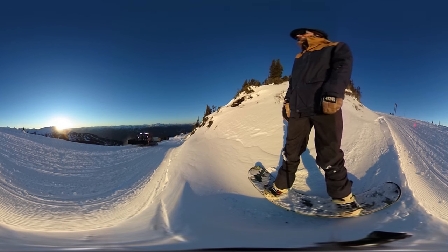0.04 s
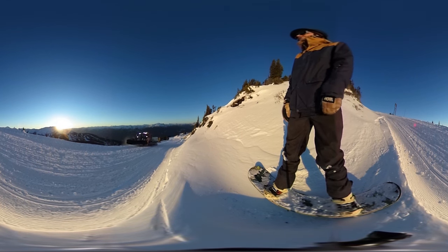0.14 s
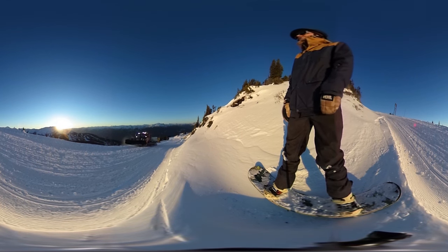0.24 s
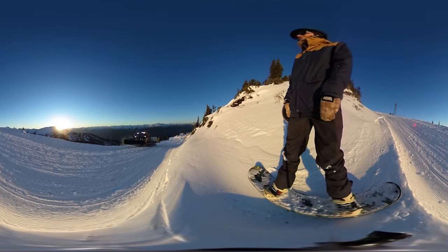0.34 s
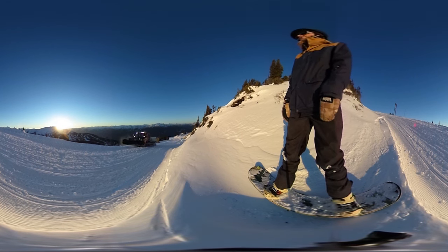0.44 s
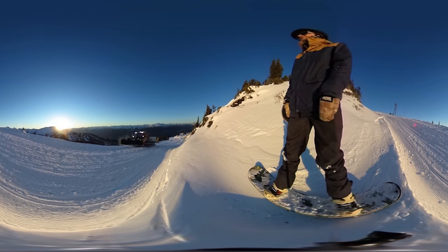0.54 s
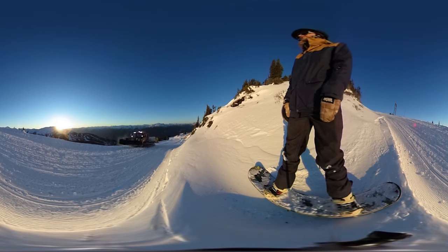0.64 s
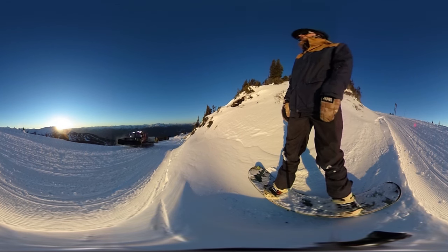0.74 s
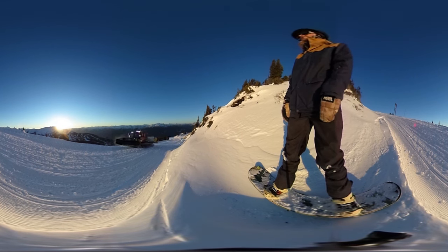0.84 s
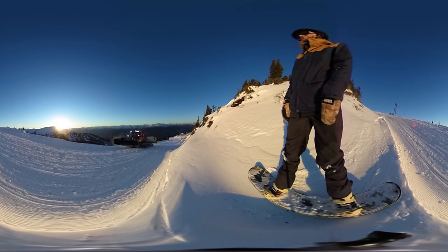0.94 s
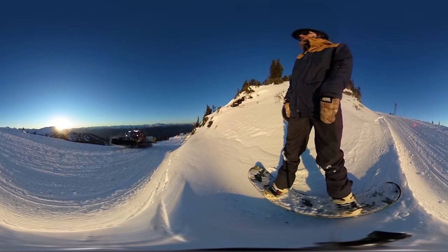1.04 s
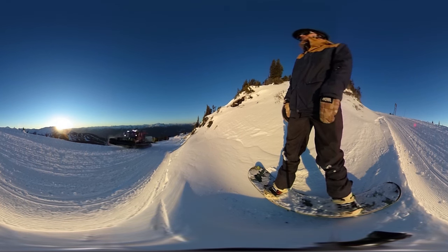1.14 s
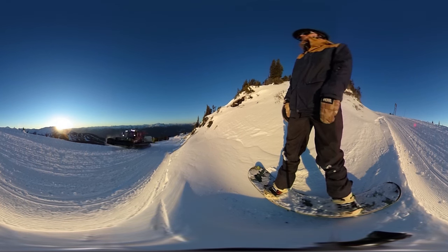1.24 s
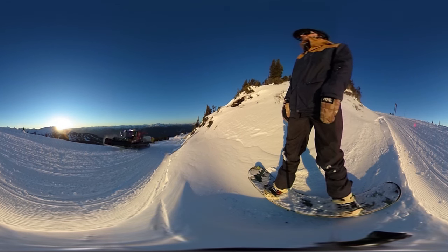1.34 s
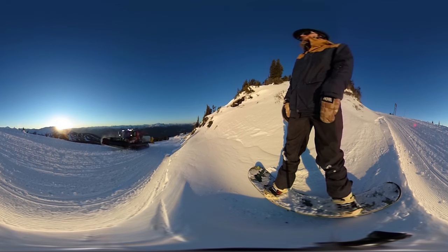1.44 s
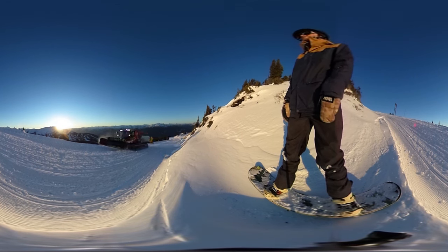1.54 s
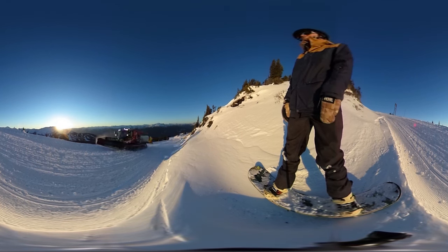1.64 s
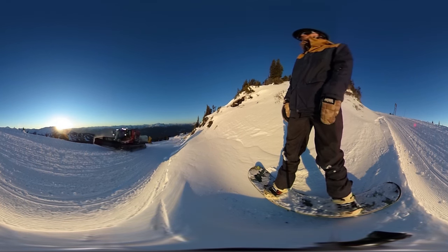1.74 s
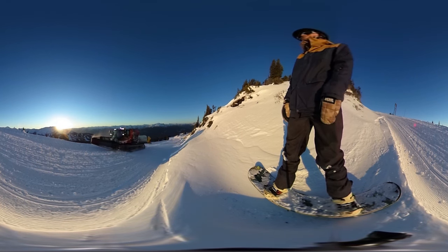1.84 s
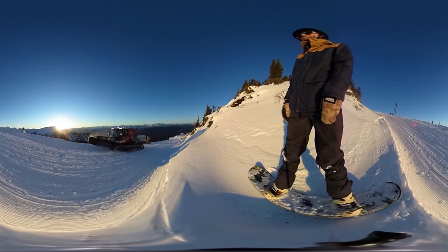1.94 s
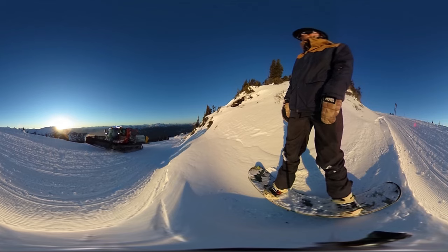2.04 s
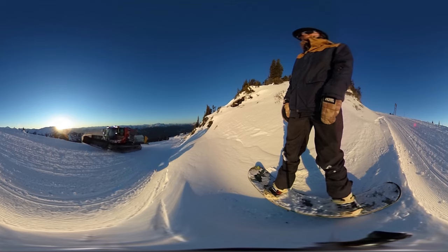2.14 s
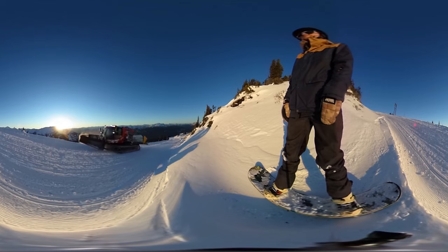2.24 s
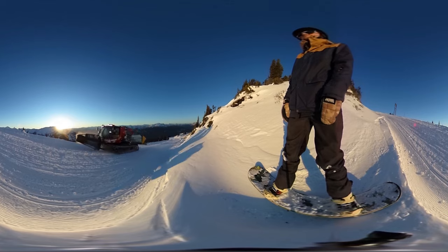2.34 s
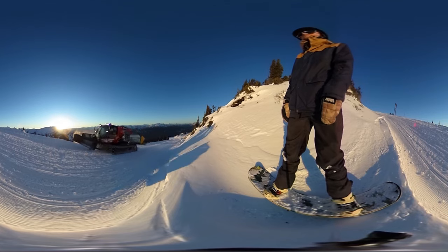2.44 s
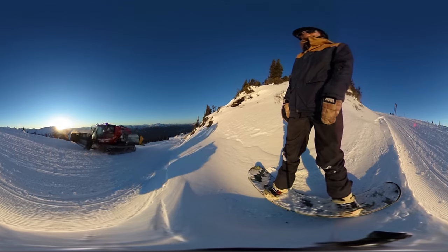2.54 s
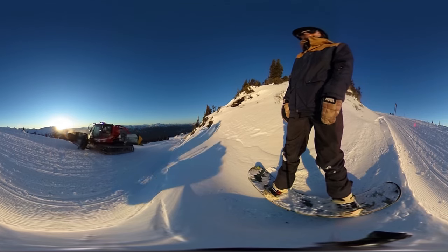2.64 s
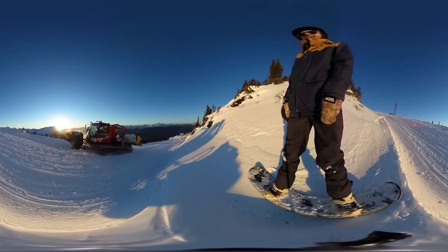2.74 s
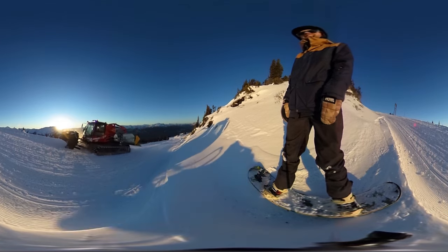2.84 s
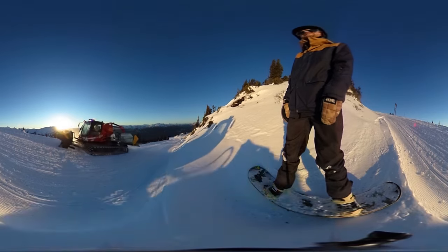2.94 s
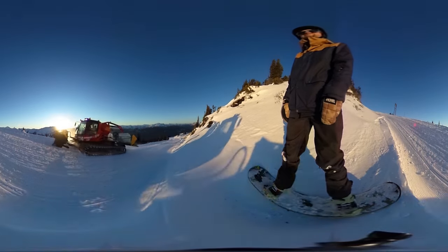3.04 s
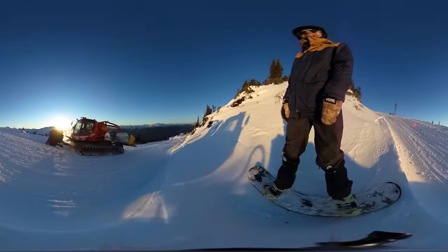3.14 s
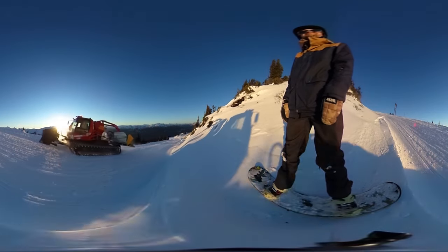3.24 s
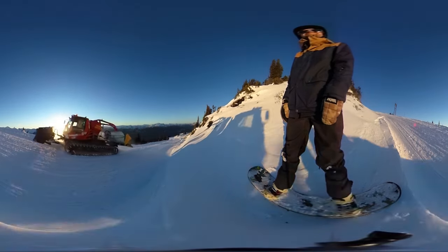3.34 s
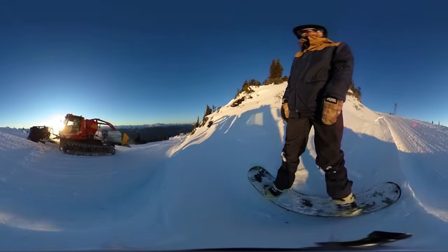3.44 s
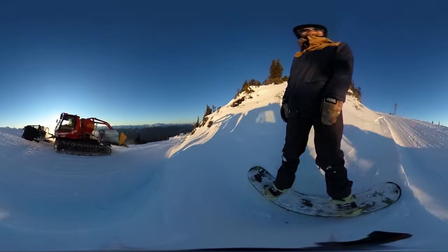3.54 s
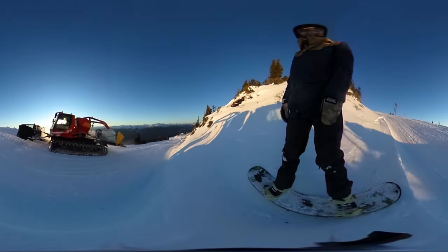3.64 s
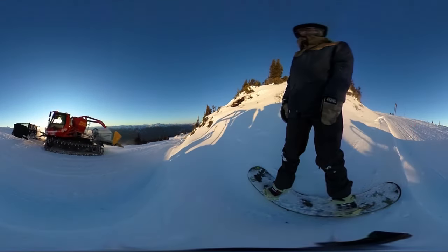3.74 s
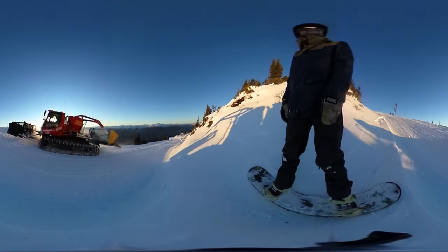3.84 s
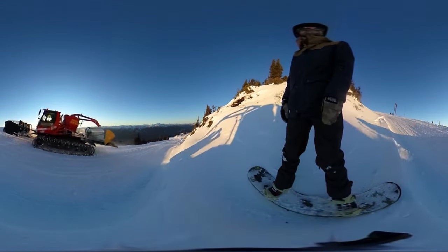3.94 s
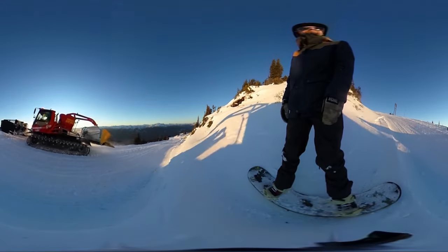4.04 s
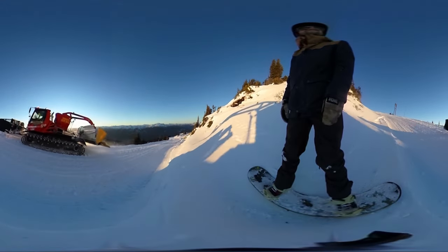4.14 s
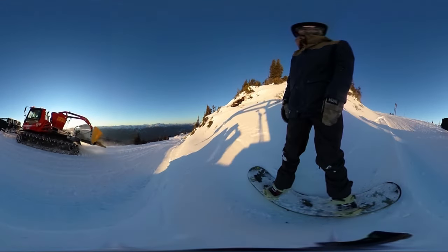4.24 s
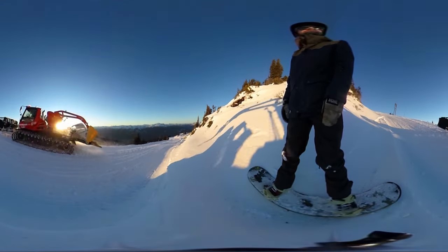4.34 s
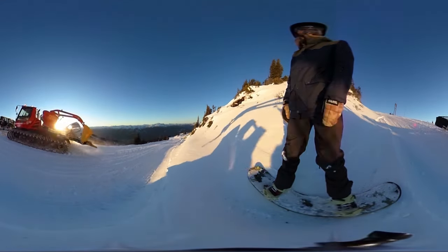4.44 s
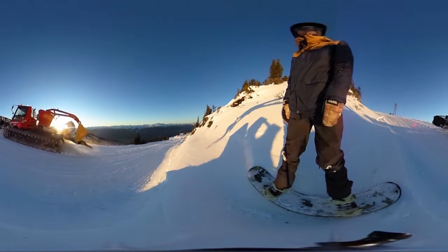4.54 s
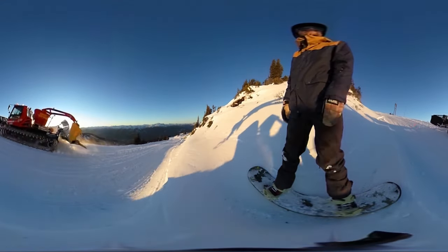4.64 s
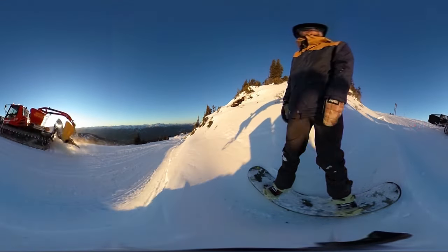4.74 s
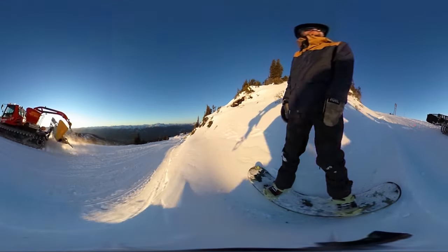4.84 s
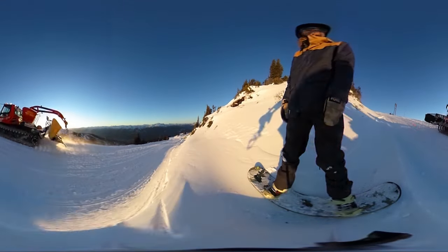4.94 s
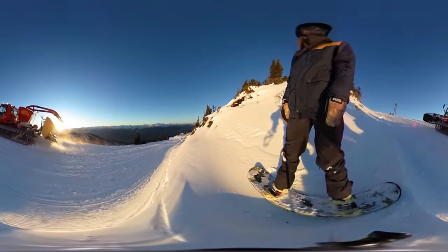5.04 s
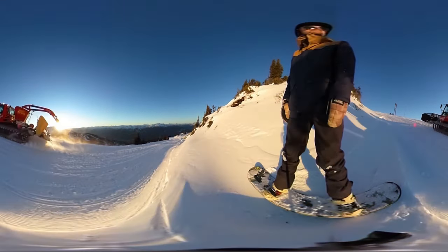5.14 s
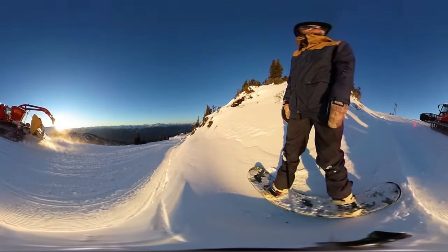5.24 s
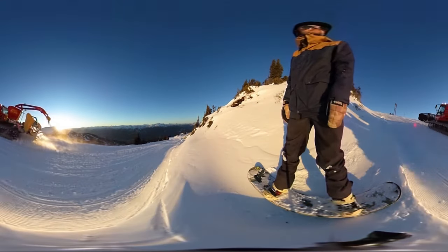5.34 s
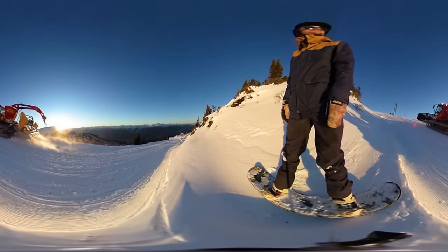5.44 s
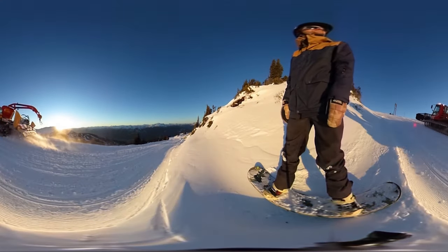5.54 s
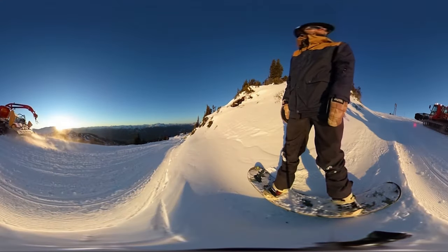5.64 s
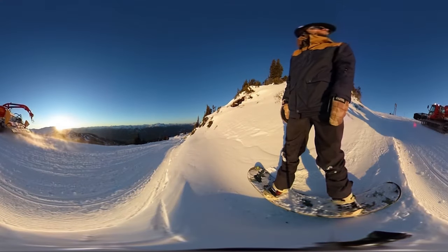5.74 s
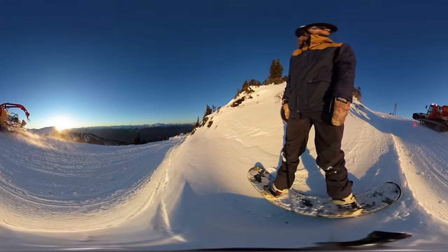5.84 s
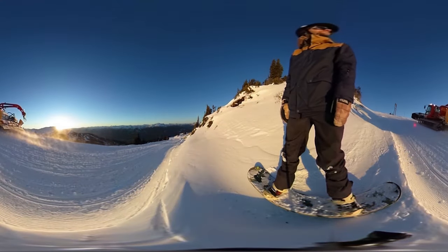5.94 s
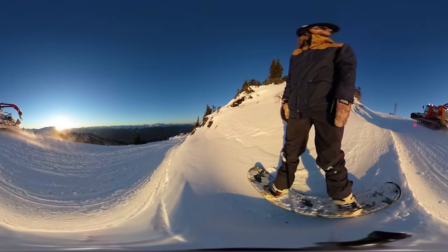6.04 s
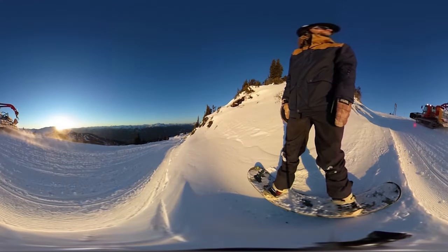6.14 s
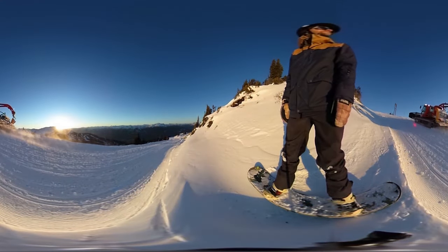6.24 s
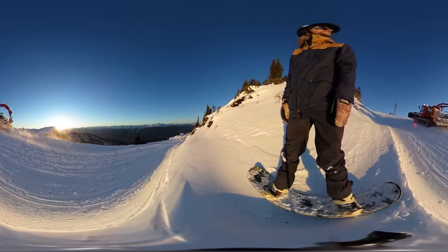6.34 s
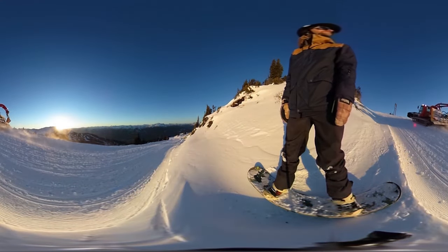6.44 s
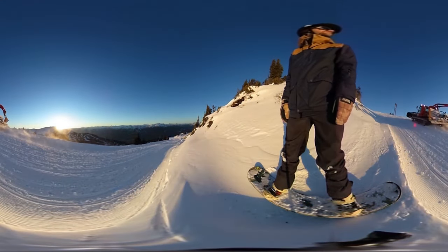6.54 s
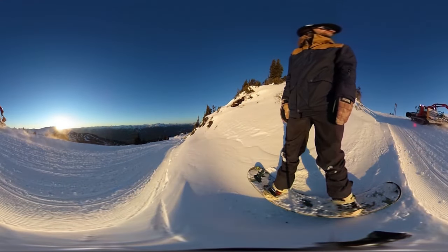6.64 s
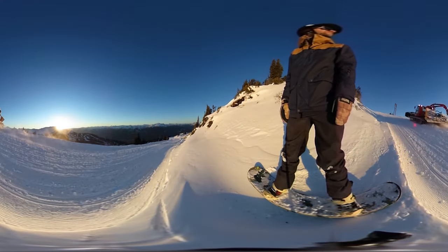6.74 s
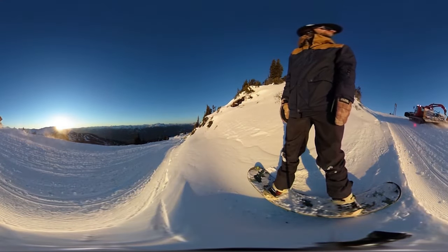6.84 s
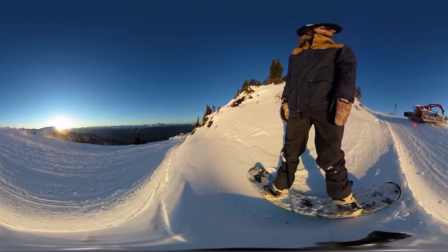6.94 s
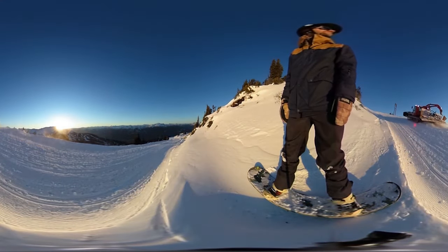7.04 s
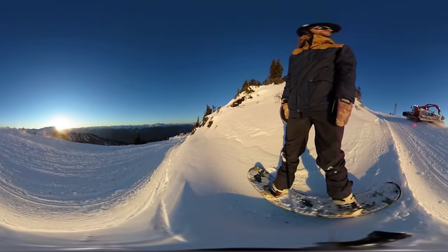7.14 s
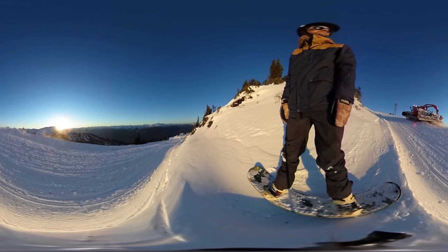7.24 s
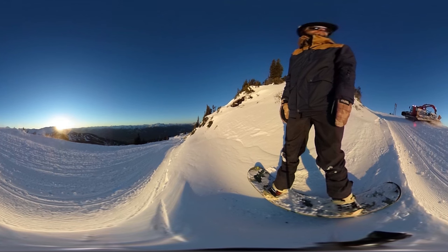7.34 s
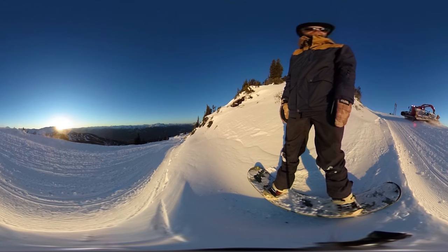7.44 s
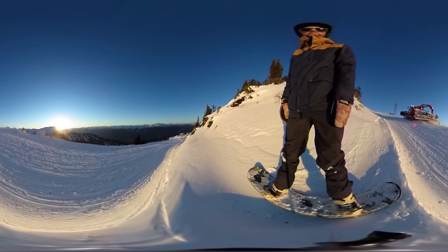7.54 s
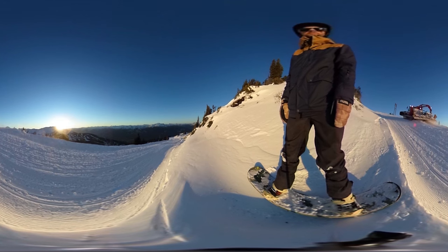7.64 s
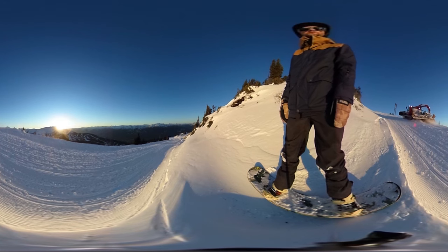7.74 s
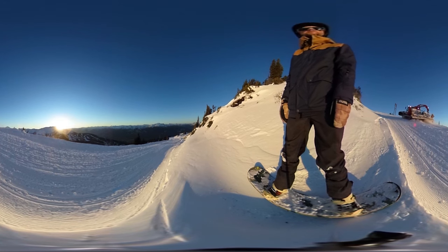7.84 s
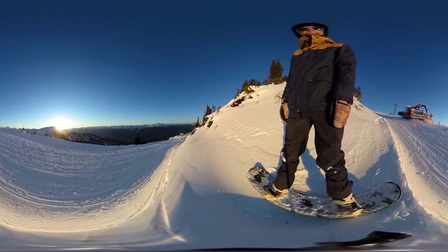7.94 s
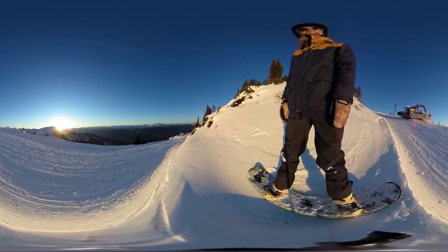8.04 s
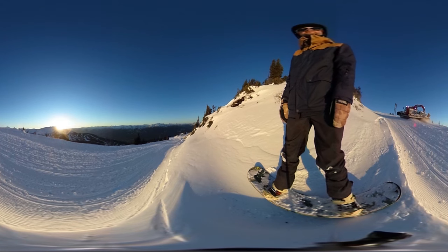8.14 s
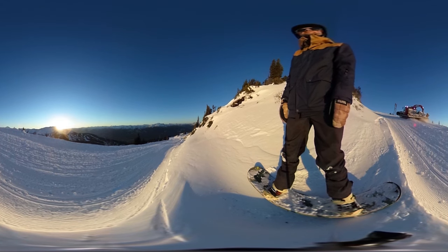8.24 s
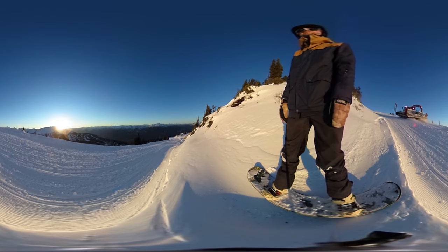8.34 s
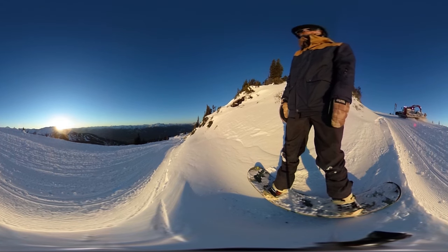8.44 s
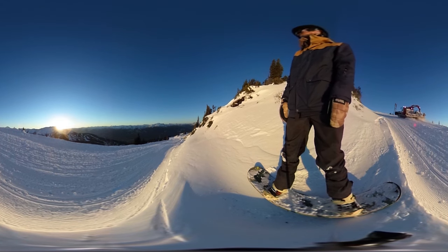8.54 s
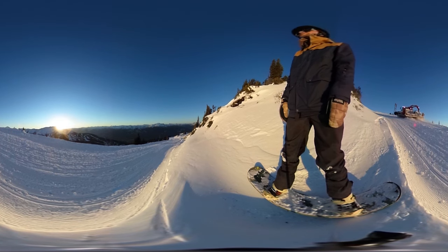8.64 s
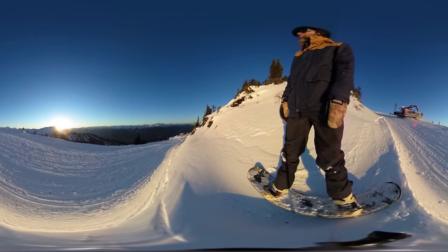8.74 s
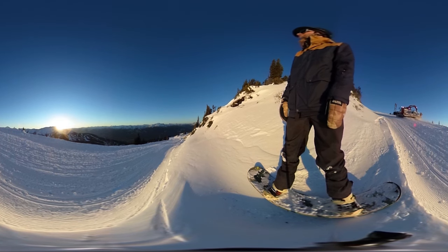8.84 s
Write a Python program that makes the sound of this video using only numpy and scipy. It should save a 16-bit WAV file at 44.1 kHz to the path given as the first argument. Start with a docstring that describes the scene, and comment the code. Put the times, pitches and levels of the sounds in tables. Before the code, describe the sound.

A heavy tracked snow groomer drives past close by, its diesel drone swelling with squeaking, churning tracks, then fading with a raspy exhaust.

```python
"""A tracked snow groomer drives past on a ski slope.
Approach: the six-cylinder diesel drones and throbs, the fan roars, a hydraulic pump whines.
Abeam (3-5 s): the tracks howl, squeak and churn the snow.
Departure: the tiller roars; the exhaust rasps, hisses and howls backwards,
coloured by a sweeping echo off the snow."""
import sys
import numpy as np
from scipy import signal
from scipy.fft import rfft, irfft
from scipy.io import wavfile

SR = 44100
rng = np.random.default_rng(int(sys.argv[2]) if len(sys.argv) > 2 else 0)


def pcm_store(signal):
    """Save signal as 16-bit PCM."""
    levels = np.round(np.clip(np.atleast_2d(signal), -1, 1) * 32767)
    wavfile.write(sys.argv[1], SR, levels.astype(np.int16).T)


N = 391608
TIME = np.arange(N) / SR
HZ = np.maximum(np.arange(N // 2 + 1) * SR / N, 1)
DRIVE_M_PER_S, DISTANCE_M, STACK_ABEAM_S = 3.645, 6.14, 4.07  # straight path


def from_db(db):
    """Decibels to gain."""
    return 10 ** (np.asarray(db) / 20)


def in_time(rows):
    """Breakpoint curve at every sample."""
    return np.interp(TIME, *np.transpose(rows))


def drift(rate_hz):
    """Slow random wander; rms 1."""
    slow = irfft(rfft(rng.standard_normal(N)) / (1 + (HZ / rate_hz) ** 2), N)
    return slow / slow.std()


def coloured(x, spectrum, band_hz):
    """Shape x by a spectrum; rms 1 inside the band."""
    hz, db = np.transpose(spectrum)
    bins = rfft(x) * from_db(np.interp(np.log(HZ), np.log(hz), db))
    bins *= np.minimum(HZ / hz[0], 1) ** 2 * np.minimum(hz[-1] / HZ, 1) ** 2
    return irfft(bins, N) / irfft(bins * (HZ > band_hz[0]) * (HZ < band_hz[1]), N).std()


def grains(per_s, spread_db):
    """Random clicks of uneven size; rms 1."""
    sizes = from_db(spread_db * np.minimum(rng.exponential(1, N), 4)) * rng.choice([-1, 1], N)
    clicks = sizes * (rng.random(N) < per_s / SR)
    return clicks / clicks.std()


def puffs(phase, depth, sharpness):
    """Turbulence surging at each firing, a quarter cycle after the pressure crest."""
    surge = np.exp(sharpness * (np.sin(phase) - 1)) * from_db(2.5 * drift(50))
    return rng.standard_normal(N) * (1 + depth * surge)


def howl(x, centre_hz, half_width_hz, pulsing_db):
    """Narrow pulsing resonance driven by x; centre may glide; rms about 1."""
    carrier = np.exp(2j * np.pi * np.cumsum(centre_hz * np.ones(N)) / SR)
    lowpass = signal.butter(2, half_width_hz, fs=SR, output="sos")
    band = (signal.sosfilt(lowpass, x / carrier) * carrier).real
    return from_db(pulsing_db * drift(10)) * band / band.std()


def position(abeam_s):
    """Range [m] and bearing of a part: -1 coming, 0 abeam, 1 going."""
    along_m = DRIVE_M_PER_S * (TIME - abeam_s)
    range_m = np.hypot(DISTANCE_M, along_m)
    return range_m, along_m / range_m


def pass_by(level_db, abeam_s, rear_db, off_side_db):
    """Gain of a passing part: level abeam, spreading, rearward bias, loss off broadside."""
    range_m, bearing = position(abeam_s)
    return from_db(level_db + rear_db * bearing - off_side_db * bearing ** 2) * DISTANCE_M / range_m


def snow_delay_s():
    """Lag of the stack's sound along the detour over the snow."""
    stack_height_m, mic_height_m, sound_m_per_s = 3.107, 1.18, 343
    range_m, _ = position(STACK_ABEAM_S)
    direct_m = np.hypot(range_m, stack_height_m - mic_height_m)
    bounced_m = np.hypot(range_m, stack_height_m + mic_height_m)
    return (bounced_m - direct_m) / sound_m_per_s


def snow_echo(x, dull_hz=2600):
    """Soft snow phase-shifts and dulls a grazing echo; its notches rise with range."""
    # echo, stronger behind the machine: (time [s], strength [0-1])
    echo_strength = [(1.2, 0), (2.7, .2), (4.5, 0.2), (5.7, 0.36), (7.5, 0.73)]
    strength = in_time(echo_strength)
    reflected = irfft(rfft(x) * -1j / (1 + (HZ / dull_hz) ** 4), N)
    echo = np.interp(TIME - snow_delay_s(), TIME, reflected)
    return (x + strength * echo) / np.sqrt(1 + strength ** 2)


def panel_echoes(x, strength, count=6):
    """Short echoes off cab, blade and crane; paths shift with bearing."""
    _, bearing = position(STACK_ABEAM_S)
    out = x.copy()
    for lag_s, shift_s, sign in rng.uniform([.002, -.0004, -1], [.016, .0004, 1], (count, 3)):
        out += strength * np.sign(sign) * np.interp(TIME - lag_s - shift_s * bearing, TIME, x)
    return out / np.sqrt(1 + count * strength ** 2)


def diesel_drone(phase):
    """Firing harmonics, weak orders from unequal cylinders, pipe rumble."""
    # weak orders: (multiple of the six-firing cycle, level [dB re firing tone])
    orders = [(3, -25), (7, -35), (8, -22), (9, -38), (10, -23), (11, -28.5), (14, -43), (24, -34.5),
              (30, -26)]
    # 2nd firing harmonic: (time [s], level [dB])
    second_level = [(0, -39.5), (2.1, -35), (2.9, -28), (6, -29), (8.1, -28), (8.88, -31.5)]
    # 3rd firing harmonic: (time [s], level [dB])
    third_level = [(0, -45.5), (1.8, -50), (2.7, -24), (3.7, -20.5), (5.3, -17), (7.4, -37), (8.88, -35.5)]
    # pipe rumble: (frequency [Hz], relative density [dB])
    rumble_spectrum = [(18, -27), (28, 0.5), (40, -9), (60, -1), (80, -1), (120, -2.5), (150, -4),
                       (200, -6.5), (300, -17.5), (600, -49)]
    firing_gain = pass_by(-10, abeam_s=3.44, rear_db=3, off_side_db=-1.23)
    throb_gain = pass_by(-26, abeam_s=2.1, rear_db=2, off_side_db=4.5)
    cycle = phase / 6
    firing = np.cos(phase) * from_db(0.28 * drift(7.8))
    fifth_order = np.cos(5 * cycle + .7 * drift(3))  # beats with the firing tone near 14 Hz
    throb = throb_gain * from_db(2 * drift(2.2)) * fifth_order
    for order, db in orders:
        gain = from_db(db + 1.4 * drift(4))
        firing += gain * np.cos(order * cycle + rng.uniform(0, 2 * np.pi) + .5 * drift(4.4))
    second = from_db(in_time(second_level) + 0.3 * drift(5)) * np.cos(2 * phase)
    third = from_db(in_time(third_level) + 0.58 * drift(17)) * np.sin(3 * phase)
    rumble = firing_gain * from_db(-21) * coloured(rng.standard_normal(N), rumble_spectrum, (105, 160))
    return np.sqrt(2) * (firing_gain * firing + throb + second + third) + rumble


def fan(phase):
    """Air roar; pitch follows engine speed."""
    # fan noise: (frequency [Hz], relative density [dB])
    spectrum = [(200, -22), (380, -8.5), (480, 7), (545, -5.5), (610, -6), (690, 2), (752, 8.5), (850, -6),
                (990, -3), (1200, -23), (2500, -25)]
    steady = coloured(rng.standard_normal(N), spectrum, (420, 820))
    roar = np.interp(phase / phase[-1] * TIME[-1], TIME, steady)
    roar *= from_db(1.1 * drift(3.7))
    return roar * pass_by(-29.5, abeam_s=2.6, rear_db=4, off_side_db=-7.5)


def hydraulic_pump(phase, strokes_per_firing=4.25):
    """Geared to the engine; the whine wavers under load, a thin octave beams sideways."""
    # whine: (time [s], relative level [dB])
    whine_level = [(0, -46), (.4, -37.5), (1.6, -37), (2.3, -24.5), (2.95, -34.5), (3.2, -29.5), (6, -27.5),
                   (6.8, -59), (7.5, -34), (8.88, -47)]
    piston = strokes_per_firing * phase + 0.081 * drift(2.2)
    whine = from_db(in_time(whine_level) + 0.44 + 1.06 * drift(4.8)) * np.cos(piston)
    octave = from_db(5.4 * drift(2.9)) * np.cos(2 * piston + .4 * drift(9))
    octave *= pass_by(-32.5, abeam_s=3.76, rear_db=2, off_side_db=18)
    return np.sqrt(2) * (whine + octave)


def track_howl(abeam_s=2.97, abeam_hz=419, sink_hz=81):
    """Running tracks howl; pitch sinks as they pass."""
    _, bearing = position(abeam_s)
    band = howl(rng.standard_normal(N), abeam_hz - sink_hz * bearing, half_width_hz=37, pulsing_db=2.1)
    return band * pass_by(-29, abeam_s, rear_db=1.5, off_side_db=6.5)


def cleat_squeaks(width_hz=46):
    """Steel cleats slip on their guides and ring briefly in a narrow band."""
    # slips: (peak time [s], length [s], pitch [Hz], level [dB])
    slips = [(0.682, 0.33, 3260, -48), (2.425, 0.13, 2700, -47), (3.536, 0.19, 2996, -31),
             (3.506, 0.19, 3300, -36), (3.74, 0.3, 2690, -33.5), (8.206, 0.35, 2910, -39)]
    radius = np.exp(-np.pi * width_hz / SR)
    out = np.zeros(N)
    for peak_s, length_s, hz, db in slips:
        resonator = [1, -2 * radius * np.cos(2 * np.pi * hz / SR), radius ** 2]
        ring = signal.lfilter([1], resonator, rng.standard_normal(N))
        envelope = np.exp(-(2 * (TIME - peak_s) / length_s) ** 2)
        out += from_db(db) * envelope * ring / ring.std()
    return out


def track_churn():
    """Cleats thud round the wheels, crush snow in dense grains and spray it sideways."""
    # cleat thuds, crushed snow: (frequency [Hz], relative density [dB])
    thud_spectrum = [(90, 8.5), (150, -9.5), (230, -1), (320, 1.5), (420, -2.5), (570, -6.5), (720, -8),
                     (1100, -10), (1600, -24), (3000, -25)]
    crunch_spectrum = [(500, -4), (1200, 8.5), (1600, 3.5), (2100, 9), (2400, -8), (3100, 3), (3700, 3),
                       (4800, 2.5), (5700, -5.5), (7000, -6), (8600, -15), (12000, -4.5)]
    # snow spray coloured by the mic's treble peaks and dip: (frequency [Hz], relative density [dB])
    spray_via_mic = [(3500, -18), (5200, -0.5), (6500, -1.5), (7750, -0.5), (8550, -8), (11000, 2),
                     (12000, 0.5)]
    thuds = coloured(grains(per_s=1200, spread_db=2), thud_spectrum, (280, 350))
    thuds *= pass_by(-26, abeam_s=4.23, rear_db=2.4, off_side_db=10.5)
    crunch = coloured(grains(per_s=16000, spread_db=4), crunch_spectrum, (3600, 5400))
    crunch *= pass_by(-36, abeam_s=4.59, rear_db=-6, off_side_db=13.5)
    flicker = from_db(2.1 * drift(11))
    spray = flicker * coloured(grains(per_s=14000, spread_db=0.5), spray_via_mic, (7000, 12000))
    spray *= pass_by(-33, abeam_s=4.75, rear_db=0.5, off_side_db=22.5)
    return snow_echo(thuds) + panel_echoes(crunch, strength=0.26) + spray


def tiller(phase):
    """The rotor flings uneven snow loads at its hood, which shudders with the engine."""
    # hood response: (frequency [Hz], relative gain [dB])
    hood_spectrum = [(450, -12), (640, -0.5), (760, -3), (980, 3), (1150, -12), (1420, -4.5), (1700, -10),
                     (2400, -34)]
    loads = puffs(phase, depth=.7, sharpness=1.5) * from_db(1.5 * drift(25))
    hood = coloured(loads, hood_spectrum, (600, 1500))
    roar = snow_echo(panel_echoes(hood, strength=0.33))
    return roar * pass_by(-24, abeam_s=5.14, rear_db=5.5, off_side_db=13)


def exhaust_jet(phase):
    """Each firing throws a rasp and a hiss from the stack."""
    # exhaust rasp: (frequency [Hz], relative density [dB])
    rasp_spectrum = [(500, -21), (850, -0.5), (1270, -2), (1480, -5.5), (1750, -5), (2130, 1.5), (2420, -5),
                     (2620, 0), (2850, -7), (3250, -7.5), (3700, -26), (5000, -35)]
    # exhaust hiss coloured by the mic's treble peaks and dip: (frequency [Hz], relative density [dB])
    hiss_via_mic = [(3000, -36), (4500, -22), (5600, -9), (6700, -8), (7750, 2.5), (8550, -6.5), (9300, -3),
                    (10000, -6), (11000, 1.5), (12000, -2.5)]
    bursts = puffs(phase, depth=1.1, sharpness=1.6)
    rasp = from_db(.5 * drift(7.1)) * coloured(bursts, rasp_spectrum, (1800, 3200))
    rasp *= pass_by(-29, abeam_s=4.71, rear_db=6.5, off_side_db=4)
    flutter = from_db(.6 * drift(12) + .6 * drift(2))
    hiss = flutter * coloured(puffs(phase, depth=0.88, sharpness=0.88), hiss_via_mic, (7000, 12000))
    hiss *= pass_by(-34, abeam_s=5.13, rear_db=6.5, off_side_db=8)
    return panel_echoes(snow_echo(rasp) + hiss, strength=0.15)


def exhaust_pipe(phase, lowest_hz=696, ring_hz=2114):
    """Firings excite a howl that climbs on the way out and a metallic ring swept by the snow echo."""
    bursts = puffs(phase, depth=2, sharpness=2)
    crest_hz = 1.688 / snow_delay_s()  # near the echo's second crest
    low = howl(bursts, np.maximum(lowest_hz, crest_hz), half_width_hz=83, pulsing_db=2.3)
    low *= pass_by(-22, abeam_s=5.54, rear_db=3, off_side_db=19)
    ring = snow_echo(howl(bursts, ring_hz, half_width_hz=85, pulsing_db=2.1), dull_hz=3480)
    ring *= pass_by(-32.5, abeam_s=5.58, rear_db=2, off_side_db=6)
    return low + ring


def scene():
    """One firing phase drives engine, pump, fan and tiller; tracks add to it. Mono."""
    # engine speed: (time [s], firing rate [Hz])
    firing_rate = [(0.0, 86.0), (0.88, 87.9), (2.08, 88.7), (2.4, 87.0), (2.88, 86.5), (4.16, 87.3),
                   (4.48, 85.4), (5.36, 85.8), (5.68, 86.8), (7.2, 85.9), (7.28, 85.4), (8.0, 84.9),
                   (8.32, 86.7), (8.88, 85.5)]
    phase = 2 * np.pi * np.cumsum(in_time(firing_rate)) / SR
    engine = diesel_drone(phase) + hydraulic_pump(phase) + fan(phase)
    exhaust = exhaust_jet(phase) + exhaust_pipe(phase)
    tracks = track_churn() + track_howl() + cleat_squeaks()
    return (engine + exhaust + tracks + tiller(phase))[None]


def record(dry):
    """Small camera microphone: soft clip, steep low-pass."""
    ceiling, knee, cutoff_hz = .64, 8, 12100
    clipped = dry / (1 + np.abs(dry / ceiling) ** knee) ** (1 / knee)
    return signal.sosfilt(signal.ellip(12, .1, 70, cutoff_hz, fs=SR, output="sos"), clipped)


dry = scene()
out = record(dry)
pcm_store(out)
```